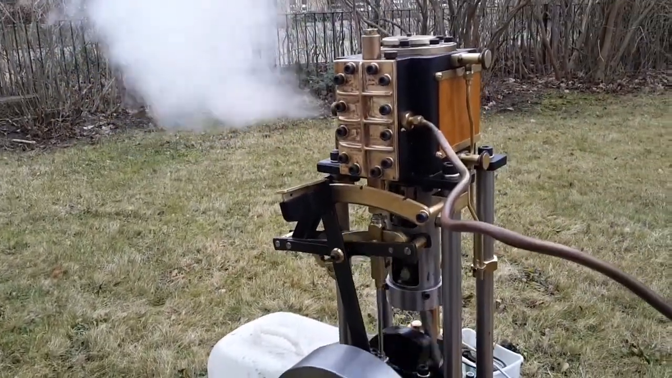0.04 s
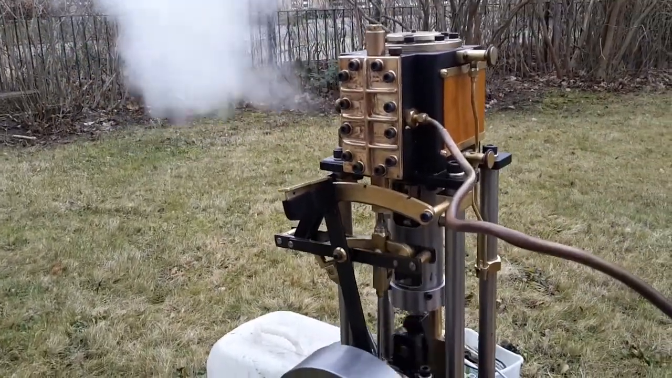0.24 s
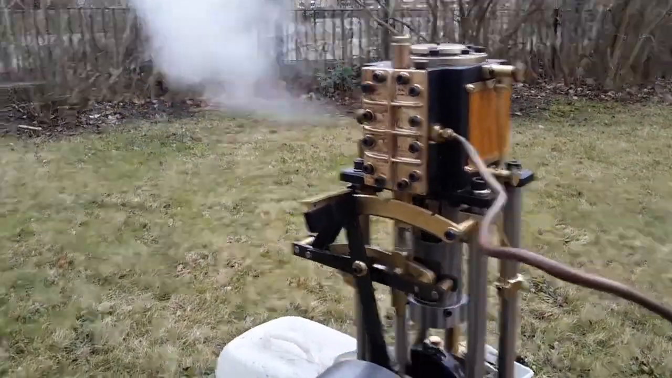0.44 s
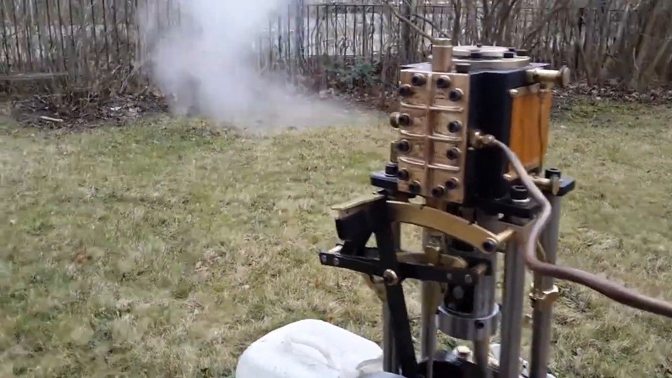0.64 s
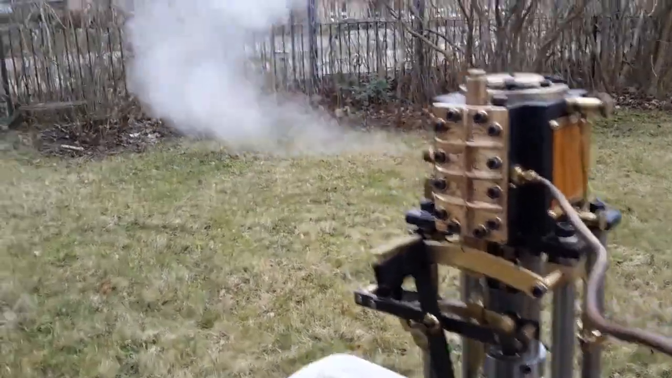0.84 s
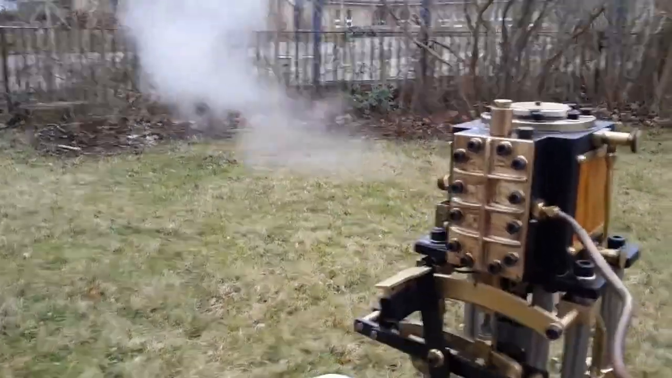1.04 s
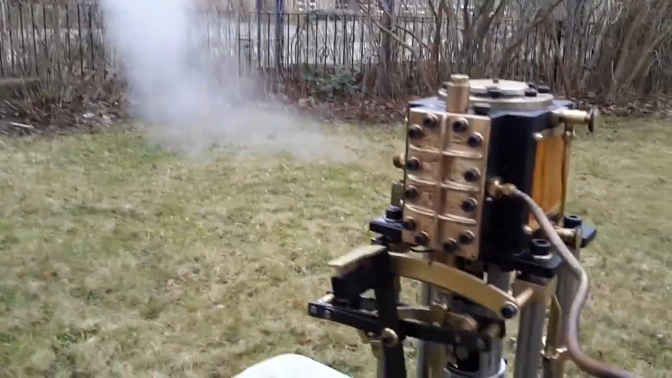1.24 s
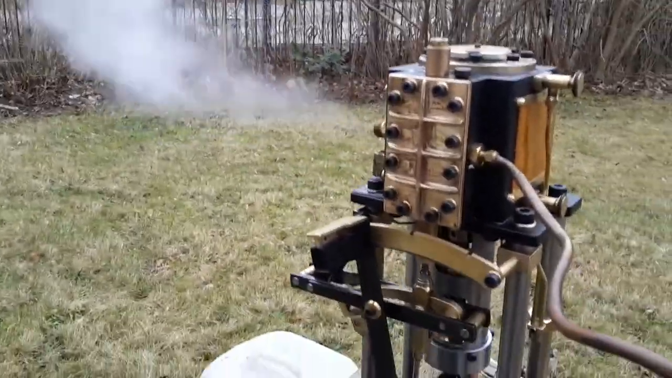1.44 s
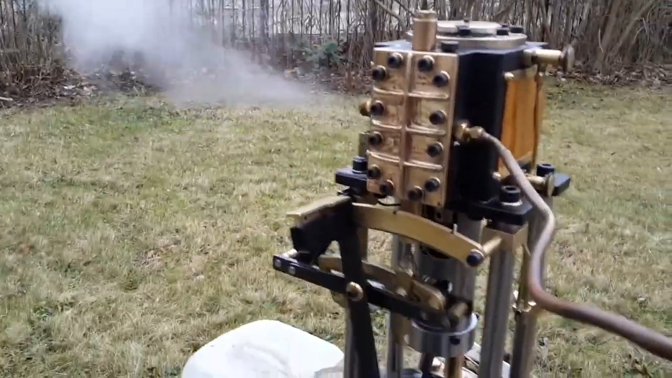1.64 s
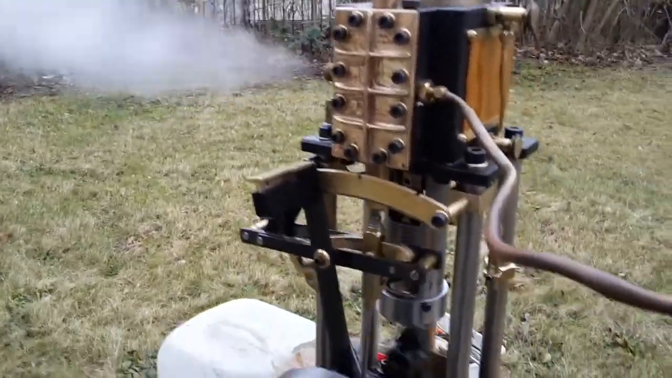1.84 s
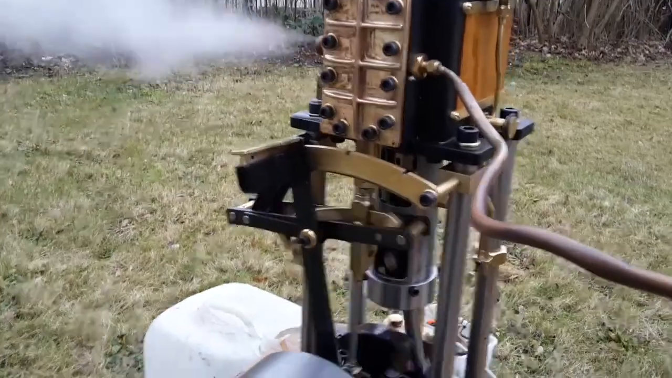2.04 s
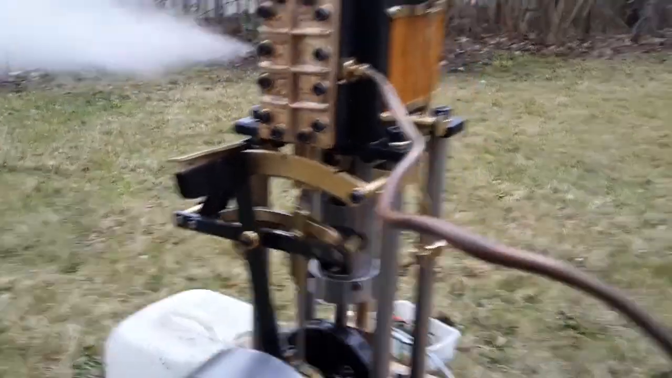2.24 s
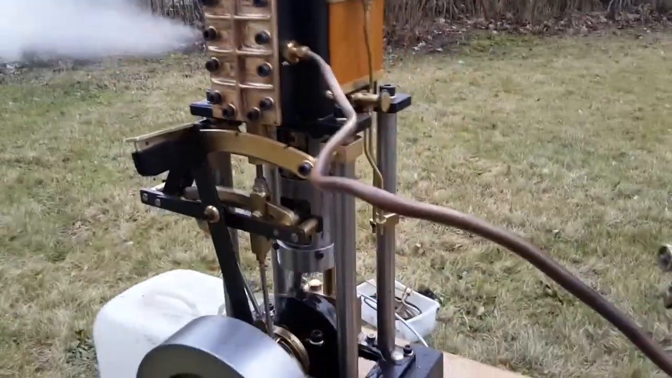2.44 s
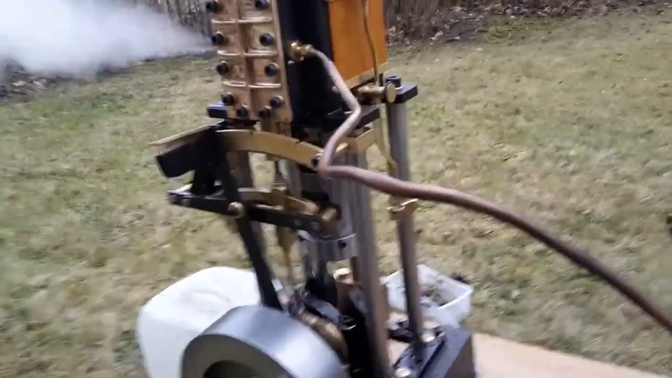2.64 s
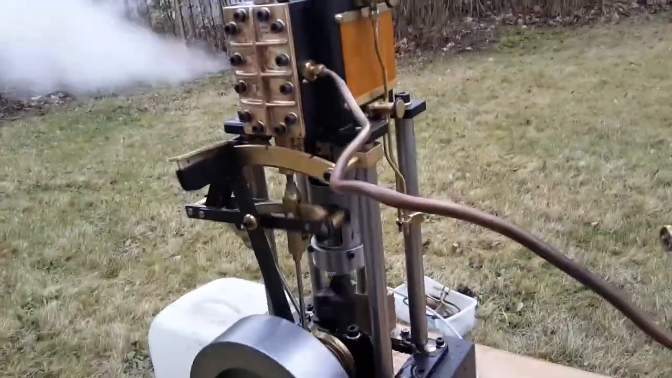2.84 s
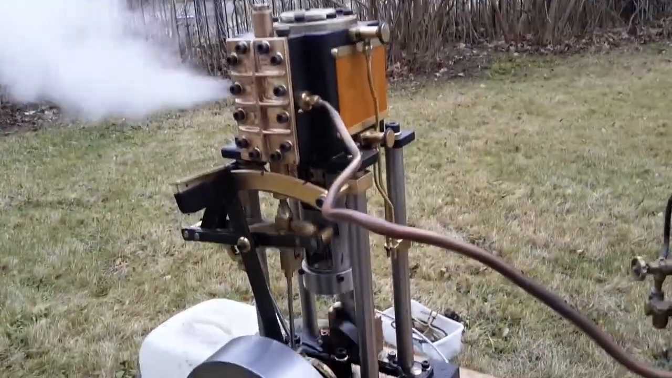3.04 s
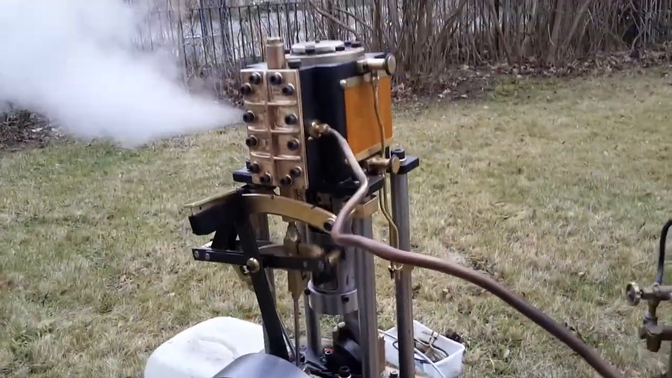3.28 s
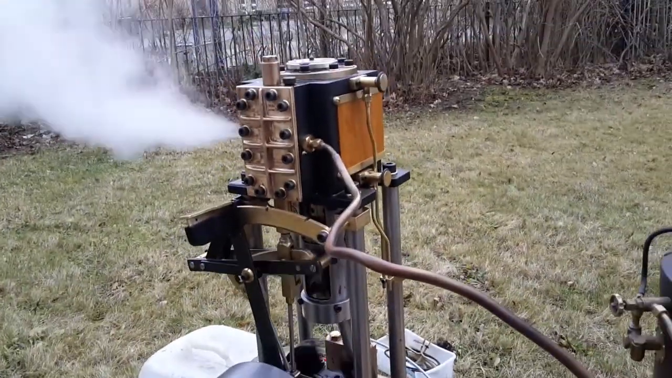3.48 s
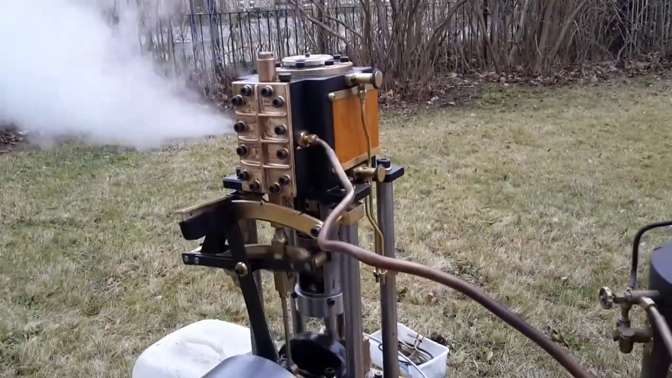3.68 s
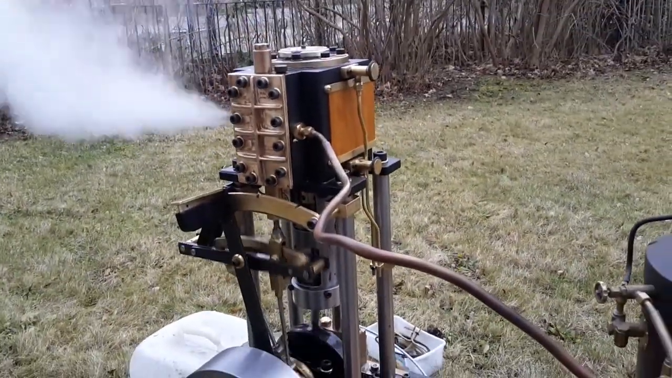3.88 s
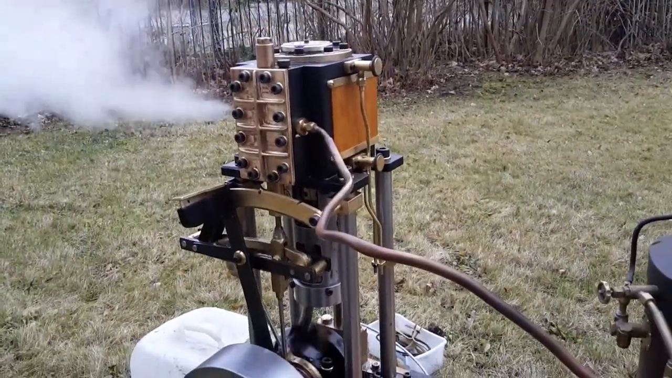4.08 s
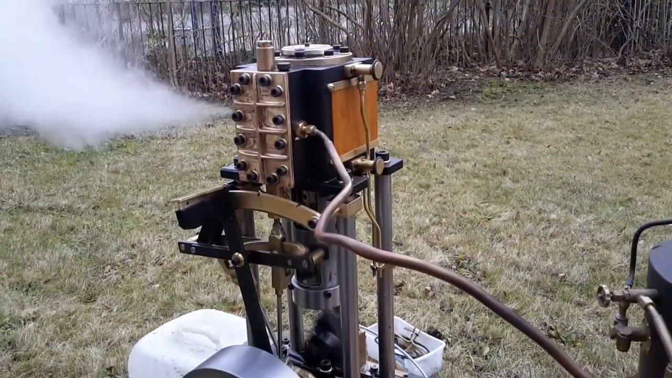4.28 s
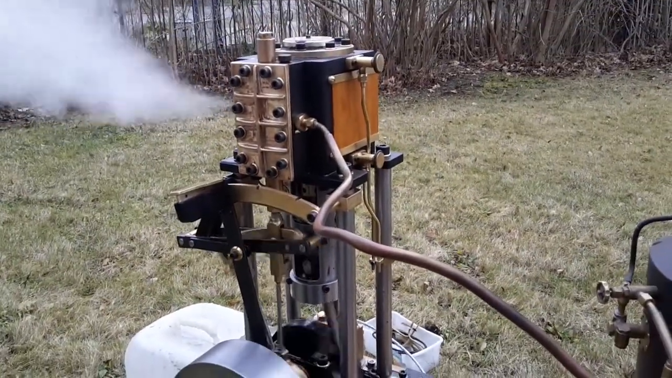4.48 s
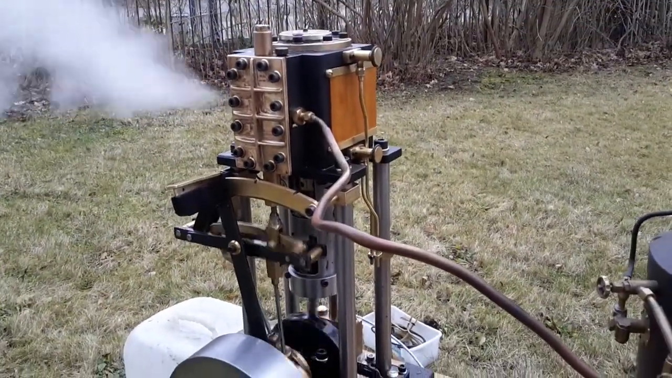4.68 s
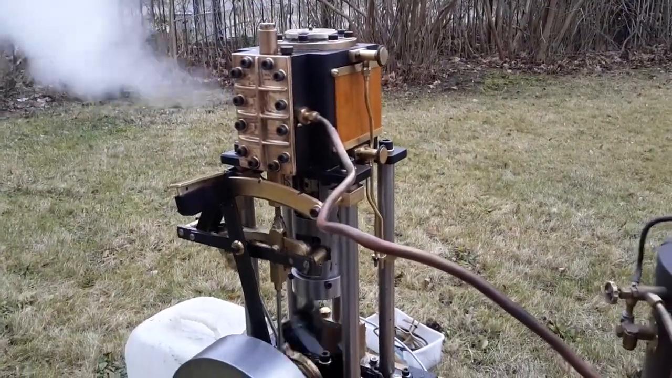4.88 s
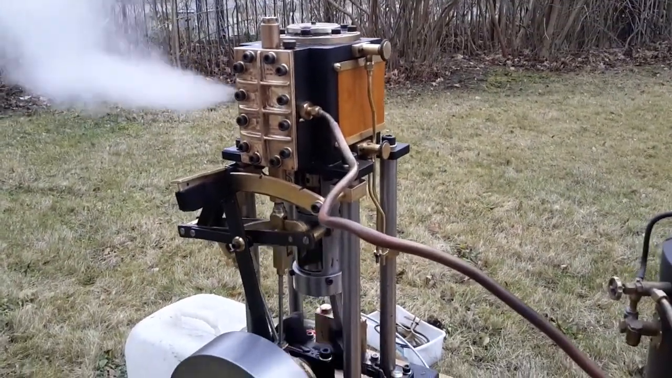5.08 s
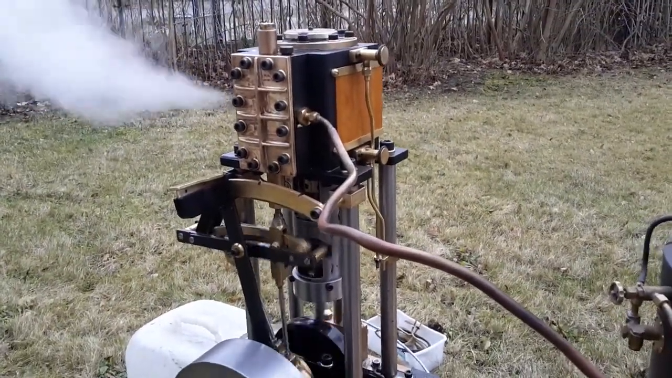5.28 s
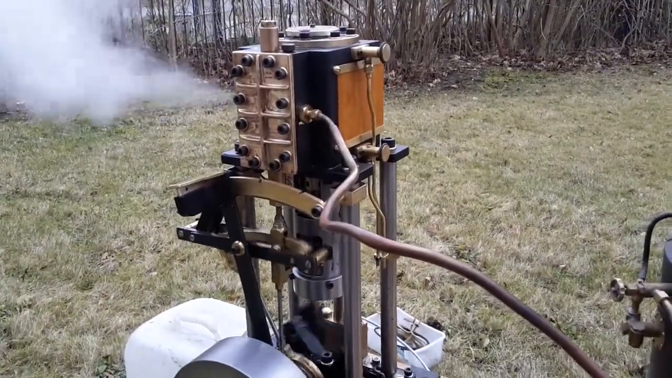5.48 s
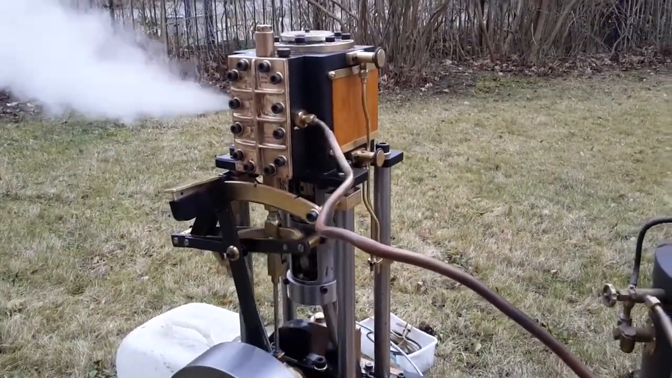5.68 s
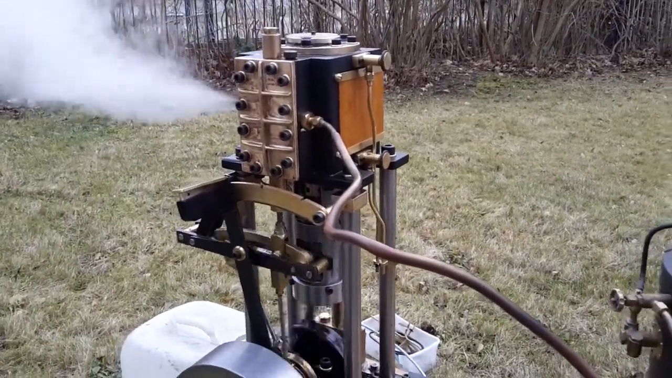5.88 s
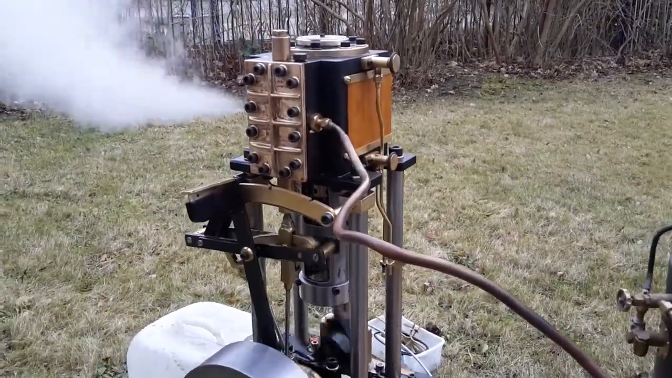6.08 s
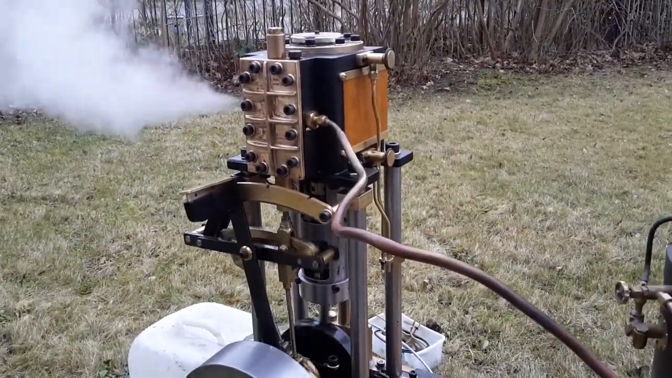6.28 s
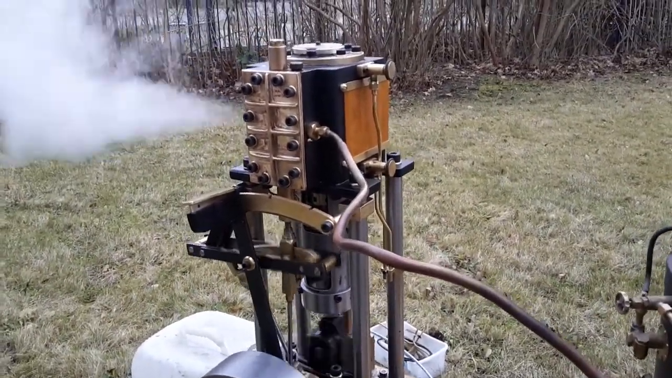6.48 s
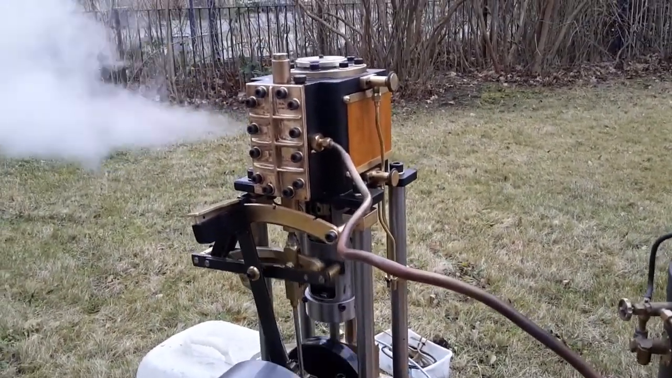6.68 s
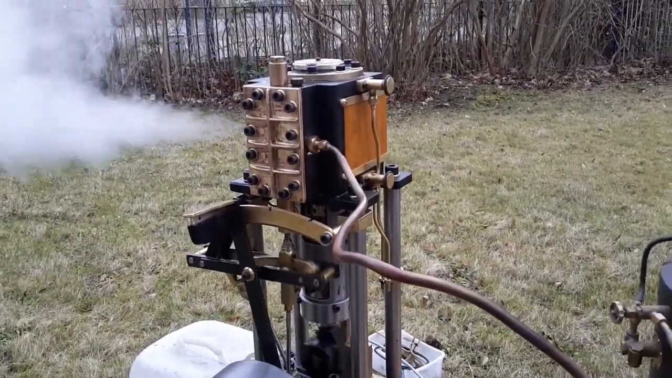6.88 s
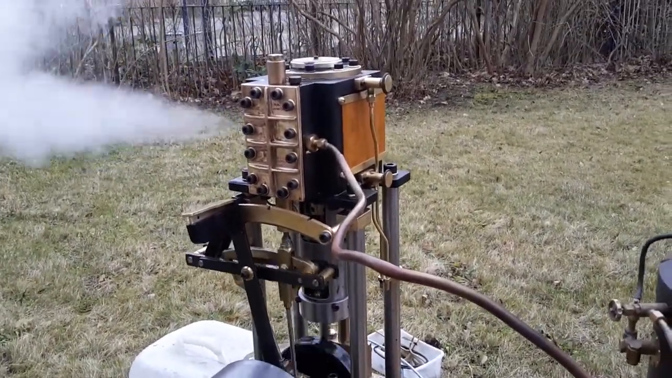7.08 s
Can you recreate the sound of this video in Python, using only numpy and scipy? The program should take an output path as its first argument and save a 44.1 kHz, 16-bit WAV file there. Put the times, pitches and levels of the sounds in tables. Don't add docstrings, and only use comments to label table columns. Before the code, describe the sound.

Hissing leaks and board knocks, a short sharp squeal, then a little steam engine chuffs rapidly with clacks and thumps, gradually losing pressure.

```python
import sys
import numpy as np
from scipy import signal
from scipy.fft import rfft, irfft, next_fast_len
from scipy.io import wavfile
from scipy.ndimage import uniform_filter1d, map_coordinates

SR = 44100
rng = np.random.default_rng(int(sys.argv[2]) if len(sys.argv) > 2 else 0)


def linear_from_db(decibels):
    return 10 ** (np.asarray(decibels, float) / 20)


def transcribe(u):
    v = np.clip(np.atleast_2d(u).T, -1, 1)
    q = np.round(v * 32767).astype(np.int16)
    wavfile.write(sys.argv[1], SR, q)


N = 313992

CATCH_S = 1.82
FULL_DB = -45

# start_s, spit_db, knock_db, thump_db
PORT_OPENINGS = [(0.088, -29, -34, -36), (0.6653, -28, -32, -25.5), (1.2714, -31.5, -32.5, -33),
                 (1.8236, -21, -27, -21), (2.1294, -18, -25.5, -19), (2.384, -21.5, -24, -20),
                 (2.623, -19, -23, -17.5), (2.8546, -23.5, -22.5, -18), (3.085, -23, -24, -16),
                 (3.3153, -25, -26.5, -17), (3.5497, -23.5, -24.5, -19), (3.7896, -25, -26.5, -20),
                 (4.0351, -26.5, -25, -21), (4.2932, -24, -26.5, -20), (4.557, -25, -26.5, -18),
                 (4.834, -25.5, -29, -18.5), (5.1217, -26.5, -26.5, -21), (5.42, -26.5, -26, -17.5),
                 (5.7341, -27, -27.5, -19), (6.0665, -26, -28.5, -20), (6.4245, -28.5, -26, -22.5),
                 (6.806, -30, -28.5, -22.5)]
# start_s, thump_db
LOWER_REVERSALS = [(.405, -45), (0.996, -39.5), (1.581, -44), (2.005, -23.5), (2.283, -20), (2.527, -19),
                   (2.761, -21.5), (2.992, -21), (3.221, -23.5), (3.455, -21.5), (3.693, -25),
                   (3.935, -19.5), (4.189, -23.5), (4.45, -25), (4.716, -20.5), (4.999, -21), (5.292, -24),
                   (5.6, -24), (5.923, -25), (6.27, -27.5), (6.639, -30), (7.036, -27.5)]
# start_s, peak_db
BUMPS = [(-0.002, -20.5), (0.012, -34), (0.0574, -19), (0.073, -28.5), (0.087, -39), (0.119, -41),
         (0.201, -34), (0.298, -32.5), (0.4212, -16.5), (0.442, -23), (0.461, -32), (0.495, -41),
         (0.914, -45.5)]
# start_s, peak_db
LEAD_INS = [
    (4.545, -31),
    (4.819, -31),
    (5.105, -31.5),
    (5.404, -29),
    (5.716, -31.5),
    (6.049, -29.5),
]
# time_s, level_db
PRESSURE = [(0, -56), (.14, -63), (.21, -59), (.55, -68), (.83, -57), (.92, -71.5), (1.1, -70.5),
            (1.43, -58), (1.67, -68.5), (1.8, -52), (1.84, -49.5), (2.1, -47), (2.4, -45), (3.2, -46.5),
            (4.1, -48.5), (5.1, -51), (6.6, -55), (7.12, -57.5)]
# freq_hz, density_db (per Hz)
EXHAUST = [(240, -13), (400, -10), (674, 2.5), (1100, -8), (1250, 2.5), (1400, -4), (1600, -5),
           (1850, -14.5), (2150, -4.5), (2300, -1.5), (2520, -6), (2930, -3.5), (3400, -7.5), (3600, -22.5),
           (4600, -53), (5980, -55), (10100, -120)]
# freq_hz, density_db (per Hz)
PORT_FIZZ = [(3000, -47), (4100, -30.5), (5500, -29.5), (6500, -20.5), (7250, -30.5), (7800, -14.5),
             (8600, -6.5), (10300, -3.5), (11000, -4), (11350, -3.5), (11700, 0.5), (12200, -2),
             (13100, -6.5), (14000, -17), (15500, -7.5)]
# freq_hz, density_db (per Hz)
GLAND = [(3500, -33.5), (5000, -32.5), (8000, -33), (9500, -19), (9900, -14), (10400, -6), (10850, -6),
         (11050, 1.5), (11350, -3), (11700, -2), (11950, -8.5), (12800, -10.5), (13900, -22), (15000, -21),
         (15800, -16.5)]


def unit(x):
    return x / np.sqrt(np.mean(x ** 2) + 1e-20)


def along(points, hz):
    f, v = np.transpose(points)
    return np.interp(np.log(hz + 1), np.log(f + 1), v)


def curves(rows, at):
    s, *cols = np.transpose(rows)
    return np.array([np.interp(at, s, c) for c in cols])


def wobble(rate):
    return map_coordinates(rng.standard_normal(int(N * rate / SR) + 4), [np.arange(N) * rate / SR])


def filtered(x, response):
    m = next_fast_len(N + 8192)
    return irfft(rfft(x, m) * response(np.fft.rfftfreq(m, 1 / SR)), m)[..., :N]


def rush(spectrum, patchy_db):
    # freq_hz, correlation
    alike = [(60, 1), (300, 0.93), (700, 0.79), (1400, 0.75), (3000, 0.85), (4500, 0.17), (7000, 0.035),
             (15000, 0.046)]
    z = signal.stft(rng.standard_normal((2, N)), nperseg=256)[2]
    field = uniform_filter1d(rng.standard_normal(z.shape[1:]), size=3, axis=0)
    field = uniform_filter1d(field, size=8, axis=1)
    pair = signal.istft(z * linear_from_db(patchy_db * unit(field)), nperseg=256)[1][:, :N]

    def mid_side(hz):
        angle = np.arccos(np.clip(along(alike, hz), -1, 1)) / 2
        return linear_from_db(along(spectrum, hz)) * [np.cos(angle), np.sin(angle)]

    mid, side = filtered(pair, mid_side)
    return unit(np.array([mid + side, mid - side]))


def add(track, s, piece):
    part = track[max(round(s * SR), 0):][:len(piece)]
    part += piece[:len(part)]


def struck(events, modes, lead, phase):
    track, t = np.zeros(N), np.arange(-SR // 50, SR // 3) / SR
    swell = np.exp(-(np.minimum(t, 0) / lead) ** 2)
    for s, db in events:
        ring = np.zeros(len(t))
        for hz, level_db, t60 in modes:
            decay = linear_from_db(level_db + rng.normal(0, 1.3) - 60 * np.maximum(t, 0) / t60)
            ring += decay * np.cos(2 * np.pi * hz * t + phase + rng.normal(0, 0.7))
        skip = max(round((1 / 50 - s) * SR), 0)
        add(track, s - 1 / 50, linear_from_db(db) * (swell * ring)[skip:])
    return track


def bursts(events, rise, fall=3):
    track, t = np.zeros(N), np.arange(SR // 12) / SR
    for s, db, length in events:
        add(track, s, linear_from_db(db) * (1 - np.exp(-t / rise)) / (1 + (t / abs(length)) ** fall))
    return track


def strokes():
    opens = np.array([row[0] for row in PORT_OPENINGS] + [7.215])
    tops = opens[:-1] + 0.0169 + 0.0493 * np.diff(opens)
    return opens, tops, np.array([row[0] for row in LOWER_REVERSALS])


def crank_share(t):
    opens, _, lows = strokes()
    k = np.arange(len(opens))
    times = np.sort(np.r_[-opens[0], opens, lows])
    turns = np.sort(np.r_[-opens[0], k, k[:-1] + 0.585])
    return np.interp(t, times, turns) % 1


def valve(share, shut_db, fall_scale):
    # opens_share, rise_share, shuts_share, fall_share, level_db
    puffs = [
        (.001, .02, 0.19, .1, -3.5),
        (.1, 0.21, 0.472, 0.038, -3.5),
        (.1, 0.21, 0.52, 0.2, 0.5),
        (0.569, 0.32, 1, 0.15, 1),
    ]
    flow = linear_from_db(shut_db)
    for opens, rise, shuts, fall, db in puffs:
        opening = np.clip((share - opens) / rise, 0, 1)
        closing = np.clip((shuts - share) / fall / fall_scale, 0, 1)
        flow = flow + linear_from_db(db) * opening * closing
    return 20 * np.log10(flow)


def garden():
    # freq_hz, density_db (per Hz)
    hum = [(13, -38), (22, -6), (49, -1), (140, -9.5), (275, -18.5), (444, -21), (1130, -29), (1790, -37),
           (3010, -43), (4000, -39), (5200, -75), (8800, -120)]
    return linear_from_db(-51.5 + 2.1 * wobble(3.18)) * rush(hum, patchy_db=1.7)


def whistles():
    # start_s, length_s, start_hz, end_hz, # level_db
    thin_tones = [(0, .09, 11200, 11030, -54), (.13, .09, 10450, 10250, -58), (.14, .13, 12100, 11900, -58),
                  (.26, .13, 9850, 9930, -58), (.3, .1, 11650, 11520, -58), (.45, .05, 10950, 10750, -59),
                  (.52, .06, 10850, 10900, -59), (.36, .06, 11350, 11150, -60),
                  (.44, .05, 10130, 10080, -61), (.36, .05, 9750, 9600, -67), (.34, .14, 8830, 8860, -71),
                  (.57, .05, 11350, 11400, -61), (.68, .08, 10650, 10850, -61),
                  (.74, .07, 11150, 11050, -60), (.82, .14, 10020, 9950, -64), (.8, .09, 10550, 10500, -62),
                  (.95, .12, 11100, 11030, -60), (1.08, .12, 11080, 11120, -60),
                  (1.44, .09, 10900, 10870, -54), (1.7, .1, 11750, 11700, -53),
                  (1.375, .07, 4050, 3950, -59), (.58, .08, 11900, 12050, -60),
                  (.82, .08, 11080, 11030, -59), (1.398, .02, 12450, 12550, -41),
                  (1.512, .045, 11760, 11740, -40), (1.63, .06, 11620, 11720, -54),
                  (.8, .07, 6480, 6450, -76), (.74, .14, 2300, 2350, -64), (1.4, .11, 2450, 2400, -63)]
    track = np.zeros(N)
    flutter, drift = linear_from_db(2.1 * wobble(110)), 0.0032 * wobble(60)
    for s, length, start_hz, end_hz, db in thin_tones:
        u = np.linspace(0, 1, round(length * SR))
        span = slice(round(s * SR), round(s * SR) + len(u))
        hz = (start_hz + (end_hz - start_hz) * u) * (1 + drift[span])
        tone = np.sin(2 * np.pi * np.cumsum(hz) / SR)
        add(track, s, linear_from_db(db + 8) * np.sin(np.pi * u) * flutter[span] * tone)
    return track


def gland_leak(t, fizz_db, running):
    # time_s, level_db
    seepage = [(0, -50), (.1, -50.5), (.5, -51.5), (.95, -48.5), (1.06, -52), (1.3, -55), (1.55, -48.5),
               (1.59, -42), (1.64, -40), (1.8, -39.5), (1.85, -40), (2.1, -37.5), (2.4, -42), (3.2, -44),
               (3.6, -47), (4.6, -48.5), (7.12, -50.5)]
    level_db = curves(seepage, t)[0] + (0.54 * fizz_db + 3) * running
    return linear_from_db(level_db + 0.37 * wobble(40)) * rush(GLAND, patchy_db=1.5)


def exhaust_puffs(pressure_db, puff_db, force, sputter):
    # freq_hz, density_db (per Hz)
    seep = [(240, -60), (400, -14), (621, 2.5), (861, -7), (1090, 2), (1540, -16), (2080, -17.5),
            (2320, -1.5), (2480, -9), (2650, -7.5), (2900, -16), (3250, -16), (3400, -35), (4600, -38),
            (5980, -36), (6500, -28), (6900, -52), (10100, -120)]
    jet = np.sqrt(force) * rush(EXHAUST, patchy_db=2.5) + np.sqrt(1 - force) * rush(seep, patchy_db=2)
    pipe = filtered(jet, lambda hz: 1 / (1 + (hz / 1030) ** 8))
    flow = linear_from_db(puff_db) * (jet - pipe) + linear_from_db(0.56 * puff_db - 3.5) * pipe
    return linear_from_db(pressure_db + 5.5 + 1.2 * sputter + 0.19 * wobble(200)) * flow


def port_fizz(pressure_db, fizz_db, running, sputter):
    gain_db = np.where(running, 7 + 0.68 * (pressure_db - FULL_DB), 5.5)
    level_db = pressure_db + 1.7 * fizz_db + gain_db
    return linear_from_db(level_db + 0.62 * sputter + 0.44 * wobble(250)) * rush(PORT_FIZZ, patchy_db=1.5)


def rumble(pressure_db):
    # freq_hz, density_db (per Hz)
    deep_flow = [(15, -51), (25, -37), (38, -21.5), (97, 1), (167, -3), (220, -8), (274, -5.5),
                 (450, -27.5), (580, -21), (990, -120)]
    # offset_s, rise_s, length_s, level_db
    throbs = [
        (-.003, 0.0016, 0.048, 4.5),
        (-0.037, 0.015, 0.037, 2),
    ]
    opens, _, lows = strokes()
    throb = linear_from_db(-6.5)
    for times, (offset, rise, length, db) in zip((opens[:-1], lows[lows > CATCH_S]), throbs):
        throb = throb + bursts([(s + offset, db, length) for s in times], rise)
    jolts = bursts([(s, db - 22.5, 0.04) for s, db in BUMPS], rise=0.0097)
    level = linear_from_db(-40.5 + 0.42 * (pressure_db - FULL_DB)) * throb + jolts
    return level * linear_from_db(2.5 + 0.27 * wobble(25)) * rush(deep_flow, patchy_db=1)


def edge_noise(pressure_db, puff_db, force):
    # freq_hz, density_db (per Hz)
    edge = [(3000, -42), (3500, 3.5), (3900, -3.5), (4400, -13), (5000, -15), (5600, -13.5), (6100, -15),
            (6500, 0.5), (6900, -7), (7400, -45)]
    return force ** 2 * linear_from_db(pressure_db + 0.66 * puff_db - 7.5) * rush(edge, patchy_db=3)


def pinched_jet():
    # freq_hz, density_db (per Hz)
    squeeze = [(7000, -33), (8200, -7.5), (9600, 5), (11000, -30)]
    opens, _, lows = strokes()
    events = [(s - 0.18 * turn, db + 9, 0.018)
              for s, turn, db in zip(lows, np.diff(opens), curves(PRESSURE, lows)[0]) if s > CATCH_S]
    return bursts(events, rise=0.0068) * rush(squeeze, patchy_db=2.2)


def steam():
    t = np.arange(N) / SR
    running = t > CATCH_S
    share = crank_share(t)
    pressure_db = curves(PRESSURE, t)[0]
    force = np.clip((pressure_db + 62.5) / 17, 0, 1) * running
    shut_db = np.where(running, -13, -6.5)
    puff_db = valve(share, shut_db, 1)
    crowding_db = 6 * np.clip((share - 0.82) / 0.11, 0, 1)
    fizz_db = 0.5 * valve(share, shut_db + crowding_db, 0.7)
    sputter = wobble(60)
    flows = gland_leak(t, fizz_db, running) + exhaust_puffs(pressure_db, puff_db, force, sputter)
    flows += port_fizz(pressure_db, fizz_db, running, sputter) + rumble(pressure_db)
    return flows + edge_noise(pressure_db, puff_db, force) + pinched_jet()


def base_board():
    # pitch_hz, level_db, t60_s
    board = [(135.4, -9.5, 1.24), (241, -1, 0.33), (304, 0.5, 0.21), (341, -2, .16), (423, -1.5, 0.21),
             (458, -7, 0.12), (380, -0.5, 0.028), (1070, -6, .03), (1370, -11, .025)]
    # start_s, peak_db
    sways = [
        (0.396, -29.5),
        (0.995, -46),
    ]
    # freq_hz, density_db (per Hz)
    jolt = [(200, -13), (380, 7.5), (560, -8), (750, -3), (1080, -2), (1450, -11.5), (2400, -27),
            (5200, -34.5), (9000, -59), (16000, -58)]
    ring = struck([(s + 0.00319, db - 15) for s, db in BUMPS], board, lead=0.0017, phase=-0.61)
    ring += struck(sways, board[:1], lead=0.0076, phase=0.33)
    shake = bursts([(s + 0.0018, db - 15.5, 0.012) for s, db in BUMPS], rise=0.0004)
    return ring + shake * linear_from_db(1.8 * wobble(350)) * rush(jolt, patchy_db=2)


def spits():
    # start_s, peak_db, low_part_db, length_s
    stray_spits = [(0.048, -36, -18, 0.004), (0.199, -39.5, 1, 0.005), (0.257, -32.5, -8, 0.0056),
                   (0.331, -45.5, 4, 0.011), (0.917, -38.5, -6.5, 0.0045), (1.156, -34.5, -22, 0.0022),
                   (1.235, -45, -17, 0.0037), (1.533, -38, -5, 0.019), (1.779, -32, -3, 0.0063),
                   (1.961, -41.5, 7.5, 0.031), (1.98, -30.5, -0.5, 0.0092), (2.245, -40.5, 7, 0.029),
                   (2.41, -38, 6, 0.0046), (2.874, -35, 11, 0.0059), (3.347, -52, -4, 0.004),
                   (3.818, -31, -2, 0.0031), (5.479, -38, 3, 0.0044), (5.993, -40, -9, 0.0051),
                   (6.146, -46, 9, 0.0051), (6.489, -32.5, -10, 0.0038), (6.688, -52, -23, 0.005),
                   (6.856, -31, -29, 0.0044)]
    # start_s, peak_db, low_part_db, length_s
    blasts = [
        (1.242, -37, -5.5, 0.022),
        (1.403, -49, -20, .025),
        (1.5686, -24, -13.5, 0.021),
        (1.885, -18, -22, 0.021),
    ]
    # freq_hz, gain_db
    spray = [(9000, 1), (11000, -3.5), (15000, -2)]
    # freq_hz, gain_db
    spit_tilt = [(900, -6.5), (2800, 0.5)]
    strays, snap_s = list(stray_spits) + list(blasts), 0.0004
    high = bursts([(s, db - 0.5, 0.012) for s, db, *_ in PORT_OPENINGS], rise=0.0046, fall=3.5)
    low = bursts([(s + 0.00042, db - 9.5, 0.015) for s, db, *_ in PORT_OPENINGS], rise=0.0039)
    low += bursts([(s, db + low_db - 9.5, length) for s, db, low_db, length in strays], snap_s)
    thin = bursts([(s, db - 7, length) for s, db, _, length in strays], snap_s)
    fizz = rush(PORT_FIZZ, patchy_db=1.5)
    port = high * filtered(fizz, lambda hz: linear_from_db(along(spray, hz)))
    body = low * filtered(rush(EXHAUST, patchy_db=2.4), lambda hz: linear_from_db(along(spit_tilt, hz)))
    gland = thin * (0.6 * fizz + 1.61 * rush(GLAND, patchy_db=2.1))
    return linear_from_db(2.34 * wobble(400)) * (port + body + gland)


def link_knocks():
    # pitch_hz, level_db, t60_s
    frame = [(175, -4, 0.045), (263.3, 1, 0.098), (327, -6.5, .06), (473, -14, 0.13), (523, -13.5, 0.096),
             (752, -8, 0.025), (1160, -19, 0.014)]
    first = [(s + 0.00239, db - 6) for s, _, db, _ in PORT_OPENINGS]
    second = [(s + 0.0195, db - 9) for s, _, db, _ in PORT_OPENINGS]
    early = [(s + 0.00194, db - 9.5) for s, db in LEAD_INS]
    lower = [(s - 0.008, db - 19.5) for s, db in LOWER_REVERSALS]
    clack = struck(first, frame, lead=0.0035, phase=-0.88) + struck(second, frame, lead=0.002, phase=0.37)
    clack += struck(early, frame, lead=0.0012, phase=-0.7)
    return clack + struck(lower, frame, lead=0.0025, phase=-0.38)


def piston_thumps():
    # pitch_hz, level_db, t60_s
    bed = [(95, -32, 0.037), (107.7, -7, 0.21), (130, -3.5, 0.13), (177, -6, 0.099), (283, -9.5, 0.03)]
    # pitch_hz, level_db, t60_s
    sole = [(105, -12.5, .1), (128, -4, 0.12), (161.8, -2.5, .12), (176.7, -3, 0.12), (259, -7, 0.083),
            (349, -13.5, 0.065)]
    # pitch_hz, level_db, t60_s
    rebound = [(95, 0, 0.21)]
    opens, tops, _ = strokes()
    thump = struck([(s, row[3] - 8) for s, row in zip(tops, PORT_OPENINGS)], bed, lead=0.0075, phase=-0.62)
    thump += struck([(s, db - 10) for s, db in LOWER_REVERSALS], sole, lead=0.011, phase=-0.47)
    swings = [(s + 0.188 * turn, row[3] - 16.5)
              for s, turn, row in zip(tops, np.diff(opens), PORT_OPENINGS) if s > CATCH_S]
    return thump + struck(swings, rebound, lead=0.012, phase=0.5)


def valve_gear_and_rattle():
    # offset_share (of a turn), level_db, growth_db (per dB of pressure)
    gear_ticks = [
        (-.13, -43, .3),
        (-.05, -41.5, 1.6),
        (0.205, -48, .2),
    ]
    # pitch_hz, level_db, t60_s
    gear = [(200, 5, 0.02), (315, -6.5, 0.037), (555, -7.5, 0.024), (850, -8, 0.024)]
    # freq_hz, density_db (per Hz)
    loose_parts = [(150, -8), (300, -3), (500, 3.5), (900, 1), (1200, -11.5), (2000, -29), (4000, -33.5),
                   (9000, -35), (16000, -56)]
    opens, _, lows = strokes()
    over_full_db = curves(PRESSURE, lows)[0] - FULL_DB
    ticks = [(s + share * turn, db + grows * over_db) for share, db, grows in gear_ticks
             for s, turn, over_db in zip(lows, np.diff(opens), over_full_db) if s > CATCH_S]
    ring = struck([(s + 0.00201, db + 2.5) for s, db in ticks], gear, lead=0.002, phase=0.4)
    shakes = [(s + 0.015, db - 9.5, 0.013) for s, _, db, _ in PORT_OPENINGS]
    shakes += [(s, db, 0.004) for s, db in ticks]
    shakes += [(s, db - 12, 0.008) for s, db in LEAD_INS]
    return ring + bursts(shakes, rise=0.0015) * linear_from_db(0.73 * wobble(350)) * rush(loose_parts, patchy_db=2.1)


def gland_squeal():
    # time_s, pitch_hz, level_db
    glide = [(1.345, 5000, -46), (1.348, 4800, -38), (1.352, 4520, -37), (1.36, 4580, -34),
             (1.363, 4300, -30), (1.373, 4230, -30), (1.376, 4050, -30), (1.392, 3980, -30),
             (1.398, 3680, -27), (1.41, 3600, -29), (1.414, 3400, -28), (1.418, 3420, -30),
             (1.421, 3620, -33), (1.44, 3640, -41), (1.475, 3650, -50)]
    # multiple, level_db
    overtones = [(1, -2), (2, 0.5), (3, 2), (4, -3)]
    # freq_hz, gain_db
    squeal_path = [(3000, -31), (3600, -30), (4050, -18), (4800, -23), (7200, -34), (7800, -23),
                   (8400, -14), (9800, -3), (10500, -5), (12800, 4.5), (13800, -11), (15500, -6)]
    t = np.arange(N) / SR
    pitch_hz, level_db = curves(glide, t)
    rough_db = 3.2
    jitter = 0.009 * wobble(200) + 0.011 * wobble(1000)
    cycle = 2 * np.pi * np.cumsum(pitch_hz * (1 + jitter)) / SR
    tones = sum(linear_from_db(db + rough_db * wobble(300)) * np.sin(k * cycle) for k, db in overtones)
    sounding = (t > glide[0][0]) * (t < glide[-1][0])
    squeal = linear_from_db(level_db + 2 + rough_db * (wobble(220) + wobble(900))) * tones * sounding
    squeal = filtered(squeal, lambda hz: linear_from_db(along(squeal_path, hz)))
    tail = rng.standard_normal(SR // 5) * linear_from_db(-60 * t[:SR // 5] / 0.11)
    return squeal + linear_from_db(-3) * signal.fftconvolve(squeal, tail / np.linalg.norm(tail))[:N]


def scene():
    mix = garden() + whistles() + steam() + base_board() + spits()
    return mix + link_knocks() + piston_thumps() + valve_gear_and_rattle() + gland_squeal()


def thin_out(x, low_hz, high_hz, step_db, spread_db, floor_db):
    hz, _, z = signal.stft(x, SR, nperseg=1024)
    power = uniform_filter1d(uniform_filter1d(np.abs(z) ** 2, size=7, axis=1), size=3, axis=2)
    usual = np.sqrt(np.abs(power))
    chance = rng.standard_normal((len(hz) // 8 + 1, z.shape[2] // 3 + 1))
    chance = np.kron(chance, np.ones((8, 3)))[:len(hz), :z.shape[2]]
    threshold = (usual * linear_from_db(step_db) + linear_from_db(floor_db)) * linear_from_db(spread_db * chance)
    weak = (np.abs(z) < threshold) & ((hz > low_hz) & (hz < high_hz))[:, None]
    return signal.istft(z * ~weak, SR, nperseg=1024)[1][:, :N]


def band_limit(x):
    return signal.sosfilt(signal.butter(12, 17000, fs=SR, output="sos"), x)


def record(dry):
    # freq_hz, gain_db
    shade = [(100, 1), (330, -1.5), (770, -2.5), (1790, 0.5), (4190, -1), (6400, -8.5), (7200, -9),
             (8600, -17), (11500, -20.5), (13000, -11.5), (14000, 3.5), (16000, -14)]
    # freq_hz, phase_rad
    port_lead = [(900, 0.21), (1400, 0.94), (2000, 0.69), (2400, 1), (2800, 0.0076), (4100, 1)]
    left = np.array([[1], [0]])

    def ports(hz):
        band = (hz < 15820) * hz ** 2 / (hz ** 2 + 61 ** 2)
        return linear_from_db(along(shade, hz) * left) * np.exp(1j * along(port_lead, hz) * left) * band

    heard = thin_out(filtered(dry, ports), 3400, 8200, step_db=-1.5, spread_db=9, floor_db=-101)
    return band_limit(heard)


dry = scene()
out = record(dry)
transcribe(out)
```